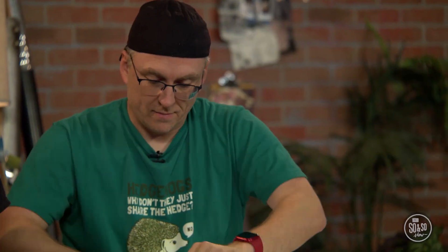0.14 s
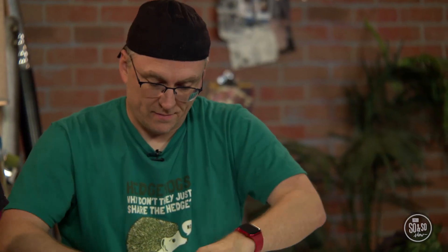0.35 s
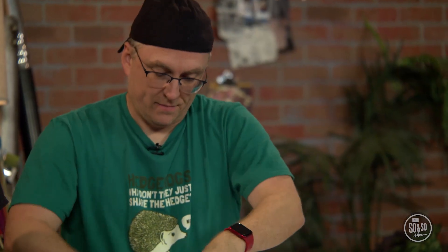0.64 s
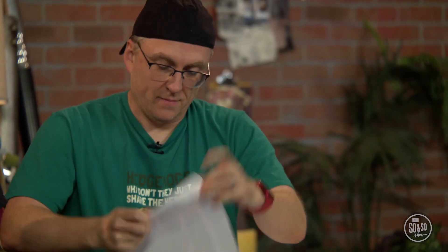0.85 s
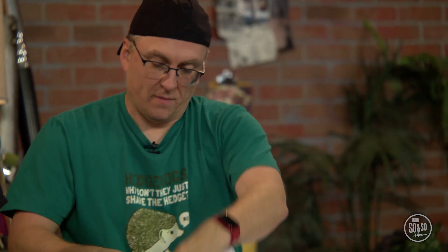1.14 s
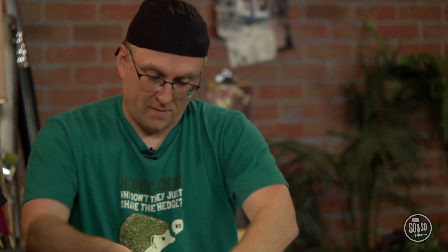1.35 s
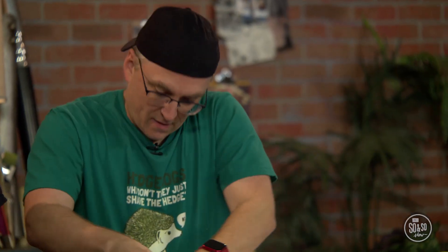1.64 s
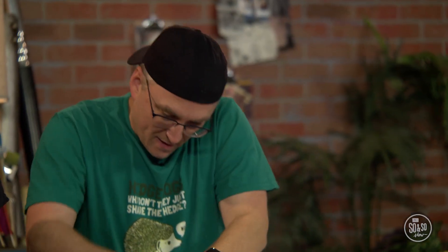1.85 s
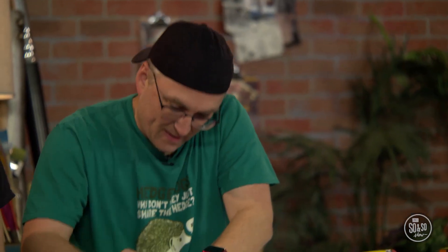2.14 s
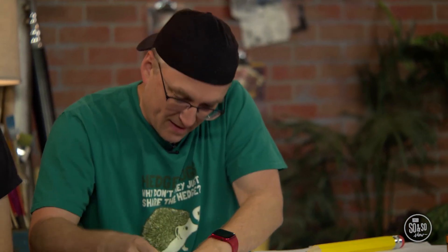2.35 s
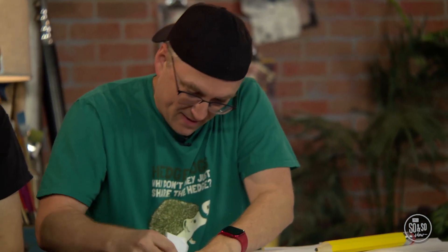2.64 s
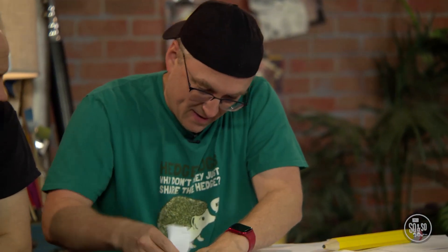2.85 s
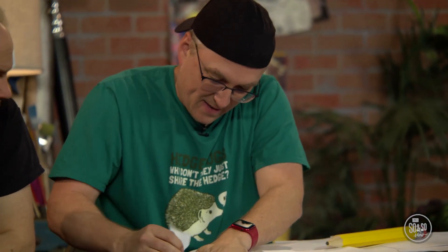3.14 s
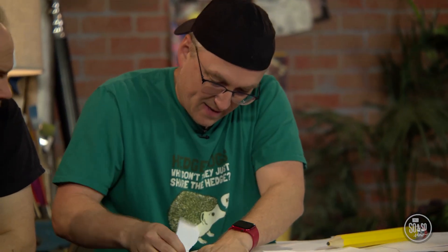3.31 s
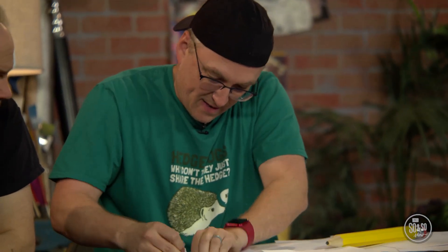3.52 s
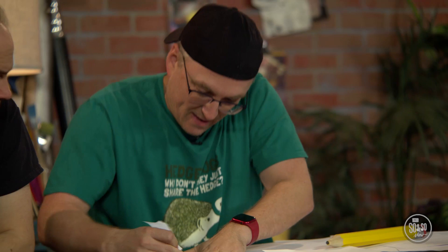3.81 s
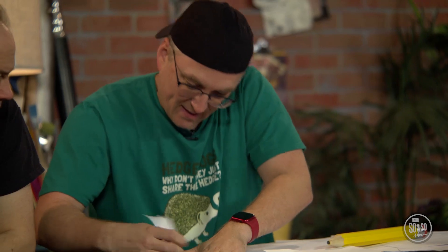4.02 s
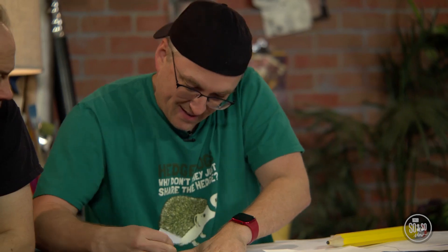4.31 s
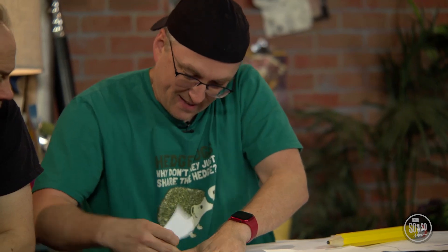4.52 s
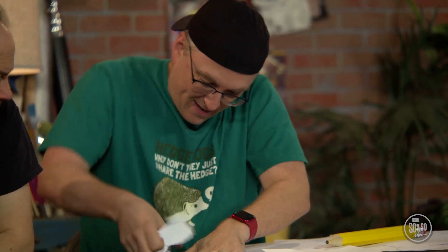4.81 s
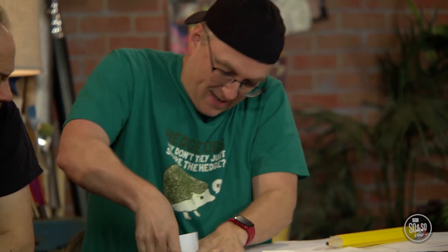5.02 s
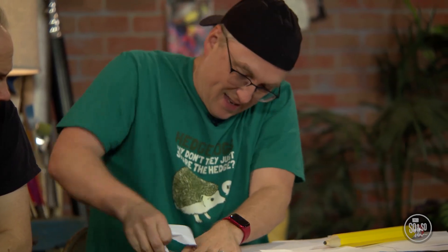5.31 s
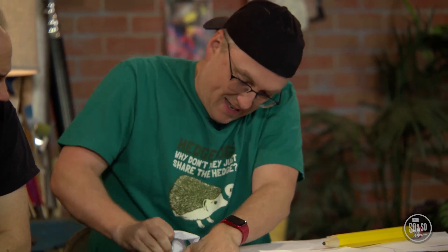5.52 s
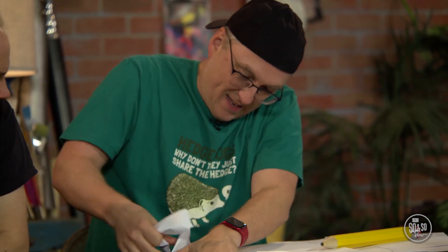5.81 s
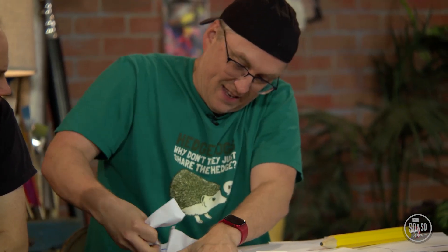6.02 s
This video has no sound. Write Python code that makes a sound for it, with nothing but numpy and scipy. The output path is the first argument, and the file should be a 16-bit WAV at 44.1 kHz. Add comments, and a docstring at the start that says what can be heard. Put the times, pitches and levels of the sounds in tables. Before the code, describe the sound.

A sheet of paper is handled, creased and torn by hand in short, crisp, uneven rips, close up in a quiet room.

```python
"""Close, crisp crackling and snapping: a sheet of paper is handled and creased, then torn in short rips.
Fibres fracture in clumps of tiny cracks, which also drive the lower rattle of the free flap and a fine
fizz. Creases snap, curved patches buckle with a pop, and sliding paper hisses. Underneath, hands bump
the table and it rumbles faintly; the quiet room adds only a short tail and a steady hush."""
import sys
import numpy as np
from scipy import signal
from scipy.fft import rfft, irfft, next_fast_len
from scipy.io import wavfile
from scipy.ndimage import uniform_filter1d

SR = 44100
rng = np.random.default_rng(int(sys.argv[2]) if len(sys.argv) > 2 else 0)


def generate_wav(signal):
    """Clip the signal to [-1, 1] and save it as 16-bit WAV at the path in sys.argv[1]."""
    frames = np.transpose(np.atleast_2d(signal))
    scaled = np.clip(frames, -1, 1) * 32767
    pcm = np.round(scaled).astype(np.int16)
    wavfile.write(sys.argv[1], SR, pcm)


N = 271634

# Pulls of the hands: start_s, length_s, fibre_db, change_over_pull_db, flap_re_fibre_db, fizz_re_fibre_db
PULLS = [(0.0, 0.023, -46.5, -10, -1, -5), (0.088, 0.031, -33, -30, -5, -35),
         (0.195, 0.05, -28, -16, -7, -24), (0.231, 0.065, -27.5, -38, -10.5, -13),
         (0.301, 0.081, -51, 21, 1.5, -6), (0.432, 0.025, -41.5, 1, -27, -8.5),
         (0.496, 0.076, -45, 13, -6, -9), (0.73, 0.043, -44, -28, -35, -4.5),
         (0.818, 0.022, -45.5, 10, -31, -7), (0.893, 0.068, -45, -18, -6, -17),
         (0.965, 0.081, -38.5, -3, -6, -23), (1.088, 0.1, -36, -16, -10, -41),
         (1.183, 0.14, -44.5, 3, -6.5, -13), (1.427, 0.1, -46.5, -9, -7.5, -9.5),
         (1.526, 0.065, -43, -7, -4.5, -14.5), (1.672, 0.02, -43, 0, -8, -11),
         (1.804, 0.041, -47.5, -12, -34, -5), (1.957, 0.1, -43, -8, -15, -7),
         (2.131, 0.039, -28.5, 9, -11.5, -4), (2.154, 0.071, -21.5, -1, -18, -11),
         (2.301, 0.064, -39, -18, -7, -10), (2.418, 0.079, -40.5, -21, -31, -9),
         (2.506, 0.12, -49, -1, -4.5, -21), (2.679, 0.022, -40.5, -1, -2, -4),
         (2.722, 0.034, -24.5, 20.5, -31, -23), (2.763, 0.049, -25.5, 3.5, -23, -10),
         (2.856, 0.072, -48.5, 6, -8, -9), (3.042, 0.075, -42.5, -1, -2, -6.5),
         (3.14, 0.081, -39.5, -29, -13, -8), (3.206, 0.048, -30, 5, -14.5, -9),
         (3.425, 0.033, -40, 13.5, 1.5, -15), (3.469, 0.09, -37.5, -11, -10.5, -3.5),
         (3.564, 0.12, -46.5, 13, -5, -11), (3.748, 0.078, -40, -13, -8, -5),
         (3.85, 0.094, -37, -1, -25, 1.5), (3.99, 0.039, -40.5, -27, -4, 3.5),
         (4.299, 0.19, -35.5, -13, -7, -4.5), (4.558, 0.099, -48, -14, -8.5, -20),
         (5.184, 0.059, -50, -12, 4.5, -4.5), (5.37, 0.073, -51.5, 4, -8, -0.5),
         (5.559, 0.077, -44, 0, 5, -6), (5.626, 0.13, -53, -6, 5.5, -1.5),
         (5.963, 0.14, -50.5, -22, -4, -1.5)]
# Rustle between pulls: time_s, fibre_db, flap_re_fibre_db, fizz_re_fibre_db
RUSTLE = [(0, -46, 4, -14), (.3, -45.5, -3.5, -10.5), (.65, -52.5, -11.5, -10), (1.1, -48.5, 4.5, -5.5),
          (1.4, -50.5, -10, -7), (1.9, -53, -4.5, -18), (2.3, -48, -10.5, -9.5), (3, -47.5, -4.5, -12.5),
          (3.4, -52.5, -4.5, -5), (4.2, -51, -11, -8.5), (4.7, -52.5, -7.5, -6), (5.4, -59, 7, -1.5),
          (6.16, -59.5, -8.5, -0.5)]
# The hands hold still: start_s, length_s
PAUSES = [(1.747, 0.039), (2.061, 0.041), (2.61, 0.037), (2.707, 0.016), (3.357, 0.047), (4.478, 0.056),
          (5.778, 0.022), (6.089, 0.018)]
# Spectra of the four stages (sheet held up, tear begun, tear deep, strip loose): frequency_hz, gain_db
HELD_SPECTRUM = [(180, -20), (300, 2), (1040, -8), (3460, -11), (6410, -14.5), (10700, -37.5)]
BEGUN_SPECTRUM = [(300, -10), (1350, -10), (1960, -15), (2520, -16), (3100, -17.5), (3990, -3),
                  (6720, -6.5), (8030, -2), (10500, -6.5)]
DEEP_SPECTRUM = [(300, -26), (680, -12), (957, -2.5), (2170, 1), (3390, -10), (3990, -3), (5710, -1.5),
                 (7240, -8.5), (9460, 2.5), (10500, 1)]
LOOSE_SPECTRUM = [(180, -48), (300, -26), (930, -3), (1600, 5.5), (2000, 8.5), (2500, 7), (3520, 8),
                  (4440, -2.5), (6300, 0), (12700, -21)]
# Upper edge of the flap's band in each stage (a small strip rings higher): edge_hz
FLAP_TOP_HZ = [2500, 2240, 3300, 4720]
# Sliding hiss against the cracks (held up, tear begins, tear ends, strip loose): gain_db
SLIDE_DB = [1, -4, -4, 5]
# Highest band of the fizz at the same four points: gain_db
AIRY_DB = [-8, -6, 4, 7]
# Snapping creases: start_s, strength_db, ring_hz, jolt_offset_db
SNAPS = [(0.0916, -15.5, 3680, -38), (0.113, -22, 2650, -14), (0.163, -20.5, 3770, -15),
         (0.203, -8.5, 2880, -19), (0.2388, -8.5, 3000, -11), (0.328, -14.5, 4000, -8.5),
         (0.5032, -23, 2700, -6.5), (0.5432, -19, 3200, -9), (0.5513, -19.5, 4440, -2.5),
         (0.56, -20, 3500, -7), (0.569, -19.5, 3000, -6), (0.842, -23, 3300, -16.5),
         (0.9128, -19.5, 2640, -7), (1.0041, -37, 3200, -13), (1.0994, -16.5, 3700, -29),
         (1.114, -18, 3220, -18), (1.151, -25, 3100, -24), (1.2473, -15, 3230, -28),
         (1.265, -20.5, 3160, -15), (1.375, -24, 3430, -23), (1.4324, -16, 3470, -34),
         (1.6237, -22, 2880, -16.5), (1.729, -24, 3670, -12.5), (2.0275, -20.5, 5200, -19),
         (2.188, -19, 4170, -28), (2.2309, -13, 3750, -15), (2.2846, -23.5, 5700, -5.5),
         (2.7587, -4, 4150, -40), (2.766, -3, 4120, -49), (2.7875, -11.5, 5200, -32),
         (2.7928, -12, 4800, -33), (3.157, -17, 5340, -18), (3.2257, -27, 5100, -28),
         (3.4539, -16.5, 5100, -11), (3.6825, -18.5, 4830, -30), (3.747, -22, 5100, -17),
         (3.7709, -21.5, 5730, -11.5), (3.7993, -31, 5500, -26), (3.9074, -16, 6070, -23.5),
         (3.9973, -14.5, 6340, -46), (4.008, -19, 6050, -23), (4.024, -15, 6350, -31),
         (4.041, -21, 6000, -15.5), (4.055, -28.5, 5600, -9), (4.2342, -24.5, 4540, -14.5),
         (4.2674, -15, 4900, -12), (4.2886, -21, 5540, -12.5), (4.345, -17.5, 4800, -39),
         (4.353, -13, 5070, -37), (4.3595, -14.5, 5260, -29), (4.414, -23, 5200, -28),
         (4.447, -18.5, 4300, -23), (4.466, -28, 4500, -22), (6.012, -24.5, 2870, -17)]
# Band that a snap's jolt shakes (sheet held up, laid down): low_hz, high_hz
JOLT_BANDS = [(254, 1510), (650, 2070)]
# Pops of the bent sheet, dry ticks when short, and one hollow ringing knock of the table (the 241 Hz row):
# start_s, level_db, pitch_hz, t60_s
POPS = [(0.2398, -24.5, 241, 0.12), (0.662, -22.5, 2500, 0.0013), (0.669, -24.5, 1760, 0.0033),
        (2.16, -23, 1147, 0.066), (2.167, -30.5, 830, 0.063), (2.2858, -15, 5860, 0.00072),
        (2.3159, -14, 3280, 0.0013), (4.269, -29, 1400, 0.012), (4.288, -23, 1260, 0.011),
        (4.609, -29, 1340, 0.0099), (4.7422, -26.5, 1450, 0.0078), (4.9756, -34, 2220, 0.002),
        (5.1209, -22.5, 4500, 0.0013), (5.4537, -28.5, 4000, 0.0018), (5.5314, -22.5, 5630, 0.002)]
# Slides of the curved sheet: start_s, length_s, level_db, centre_hz, width_hz
SWISHES = [(1.027, 0.05, -39.5, 1600, 500), (5.565, 0.099, -42.5, 2160, 800)]
# Hands bump the table: peak_s, level_db, pitch_hz
BUMPS = [(0.2, -36, 317), (0.212, -34.5, 77.6), (0.356, -36, 182), (0.37, -38, 110), (0.382, -34, 352),
         (0.39, -31.5, 101), (0.506, -40, 280), (0.91, -38.5, 269), (1.127, -39, 75.5), (1.261, -38, 87),
         (1.476, -38.5, 300), (1.485, -32, 93), (1.557, -38, 68), (2.237, -36, 67.5), (2.289, -35, 75.4),
         (2.971, -36.5, 280), (3.06, -31.5, 71.6), (3.45, -38, 87), (3.686, -38.5, 89), (3.736, -30.5, 73),
         (4.241, -36, 65), (4.278, -34.5, 60), (5.355, -37, 66)]
# Course of the table's rumble: time_s, level_db
RUMBLE_LEVELS = [(0.0, -44), (0.14, -52.5), (0.46, -48), (0.62, -53), (2.52, -55), (3.1, -52),
                 (3.24, -60.5), (3.48, -55), (3.62, -52), (4.05, -56.5), (4.78, -57.5), (5.92, -65),
                 (6.16, -64.5)]
# Spectrum of the rumble: frequency_hz, gain_db
RUMBLE_SPECTRUM = [(12, -52), (20, 6), (187, -3.5), (238, -8.5), (500, -13), (1100, -120)]
# Spectrum of the room tone: frequency_hz, gain_db
AIR_SPECTRUM = [(18, -36), (118, -31), (554, -2.5), (1070, -1.5), (2750, -6), (5740, -4.5), (12300, -17),
                (16000, -20)]

LAID_S, DEEP_S, LIFTED_S = 1.793, 3.6, 5.1  # sheet laid down, tear runs deep, strip pulled away
FIZZ_HZ, AIRY_HZ, TOP_HZ = 8640, 13470, 18000  # band edges of the treble
RISE_S, RISE_SHARE, STOP_S = 0.0052, 0.15, 0.023  # a pull's rise lengthens by this share of its length
ARCH_DB_PER_S, PAUSE_DB = 44, -24  # a long pull swells further above its ends; the rustle dips in a pause
STICK_DB, AIRY_DB_PER_DB = 5.5, 0.8  # a fizzier tear stutters more and reaches higher
SNAP_T60_S, RING_DB_PER_DB = 0.018, 0.28  # decay of a -16 dB snap; a louder one rings longer
JOLT_T60_S = [0.037, 0.034]  # sheet held up, laid down


def tearing(fibre_db, flap_db, fizz_db):
    """Source and filter: the same fractures and friction excite the flap, the fibres and the fizz."""
    t = np.arange(N) / SR
    stage_s = [LAID_S - .1, LAID_S, LIFTED_S - .5, LIFTED_S]
    slide_db, airy_db = (np.interp(t, stage_s, db) for db in (SLIDE_DB, AIRY_DB))
    slide_db += 2.5 * drift(40)
    cracks_per_s = 894 + 140 * np.clip(fibre_db + 51, 0, 35)  # the harder the pull, the denser
    breaks = unit_rms(fractures(cracks_per_s, spread_db=2.8, clump_db=4))
    slide = gain_of(slide_db) * rng.standard_normal(N)
    excitation = bending(breaks + slide, depth_db=2.7)
    laid, deep, lifted = (np.clip((t - s) / 0.056, 0, 1) for s in (LAID_S, DEEP_S, LIFTED_S))
    stick_db = .5 * (1 + laid - lifted) * STICK_DB * gain_of(.5 * (fizz_db - fibre_db))
    stutter = gain_of(stick_db * drift(109) - np.log(10) / 20 * stick_db ** 2)  # keeps the mean power
    shares = [1 - laid, laid - deep, deep - lifted, lifted]
    spectra = [HELD_SPECTRUM, BEGUN_SPECTRUM, DEEP_SPECTRUM, LOOSE_SPECTRUM]
    body = np.zeros(N)
    for share, spectrum, edge_hz in zip(shares, spectra, FLAP_TOP_HZ):
        sheet = coloured(excitation, spectrum)
        flap = gain_of(flap_db) * unit_rms(band(sheet, 510, edge_hz))
        fibres = gain_of(fibre_db) * unit_rms(band(sheet, edge_hz, FIZZ_HZ))
        body += share * (fibres + flap)
    fizz = bending(breaks + gain_of(-7) * slide, depth_db=2)  # sliding hardly reaches this high
    fizz = band(fizz, 0.93 * FIZZ_HZ, TOP_HZ)
    fizz = unit_rms(coloured(fizz, [(FIZZ_HZ, 0), (11500, -5), (16000, -3)]))
    airy_db += AIRY_DB_PER_DB * (fizz_db - fibre_db - 14.5)
    fizz = band(fizz, FIZZ_HZ / 2, AIRY_HZ) + gain_of(airy_db) * band(fizz, AIRY_HZ, TOP_HZ)
    return stutter * (body + gain_of(fizz_db) * fizz)


def hand_effort():
    """Incoherent sources add in power: pulls and rustle sum to the fibre, flap and fizz levels in dB."""
    t = np.arange(N) / SR
    fibre_db, flap_db, fizz_db = curves(RUSTLE)
    still = sum(np.clip(np.minimum(t - s, s + length - t) / STOP_S + .5, 0, 1) for s, length in PAUSES)
    power = gain_of(fibre_db + PAUSE_DB * still + [0 * t, flap_db, fizz_db]) ** 2
    for start, length, db, change_db, *offsets_db in PULLS:
        age = np.arange(0, length + STOP_S, 1 / SR)
        rise = age / (RISE_S + RISE_SHARE * length)
        release = (length + STOP_S - age) / STOP_S
        edges = np.clip(np.minimum(rise, release), 0, 1) ** 2
        from_middle = age / length - .5
        arch_db = ARCH_DB_PER_S * length * (2 * from_middle) ** 2
        pull = edges * gain_of(db + change_db * from_middle - arch_db)
        for layer, offset_db in zip(power, [0, *offsets_db]):
            add(layer, start, (pull * gain_of(offset_db)) ** 2)
    return 10 * np.log10(power)


def fractures(per_s, spread_db, clump_db, patches=24):
    """Stick-slip fracture: fibres break at random, many small and few large, in clumps."""
    size = gain_of(spread_db * np.minimum(rng.exponential(1, N), 4))
    impulses = size * (rng.random(N) < per_s / SR)
    impulses = impulses * gain_of(clump_db * drift(106)) / np.sqrt(per_s)
    patch, out = rng.integers(0, patches, N), np.zeros(N)
    for k, hz in enumerate(np.geomspace(1500, 13000, patches)):
        response = crack(rng.standard_normal(512), hz, t60_s=0.0087, ring_db=3.4, rise_s=0.00058)
        out += signal.oaconvolve(impulses * (patch == k), response)[:N]
    return out


def crack(noise, hz, t60_s, ring_db, rise_s):
    """Damped resonance: a patch of sheet reinforces a brief noise burst in a wide band around hz."""
    t = np.arange(len(noise)) / SR
    resonance = np.sin(2 * np.pi * hz * t) * np.exp(-.9 * hz * t)
    ring = np.convolve(noise, resonance)[:len(t)]
    envelope = np.minimum(t / rise_s, 1) * gain_of(-60 * t / t60_s)
    return envelope * (noise + gain_of(ring_db) * unit_rms(ring))


def bending(x, depth_db):
    """Time-varying filtering: as the sheet bends, its colour shifts in patches of about 1 kHz by 50 ms."""
    spectrogram = signal.stft(x, nperseg=256, noverlap=192)[2]
    field = uniform_filter1d(rng.standard_normal(spectrogram.shape), size=7, axis=0)
    field = unit_rms(uniform_filter1d(field, size=36, axis=1))
    return signal.istft(spectrogram * gain_of(depth_db * field), nperseg=256, noverlap=192)[1][:N]


def crease_snaps(fizz_share_db):
    """Impulsive excitation: a crease gives one sharp crack, and its jolt shakes the flap a little longer."""
    sharp, dull = np.zeros(N), np.zeros((2, N))
    for (start, db, hz, jolt_db), noise in zip(SNAPS, rng.standard_normal((len(SNAPS), 2, 2048))):
        laid = int(start > LAID_S)
        t60_s = SNAP_T60_S * gain_of(RING_DB_PER_DB * (db + 16))
        snap = crack(noise[0], hz, t60_s, ring_db=3.2, rise_s=0.00026)
        jolt = crack(noise[1], 2010, JOLT_T60_S[laid], ring_db=2.1, rise_s=0.0015)
        add(sharp, start, gain_of(db) * snap)
        add(dull[laid], start, gain_of(db + jolt_db) * jolt)
    fizz = gain_of(fizz_share_db - 16) * band(sharp, FIZZ_HZ, TOP_HZ)
    jolts = sum(band(x, *edges) for x, edges in zip(dull, JOLT_BANDS))
    return gain_of(-12.5) * band(sharp, 2370, 9400) + fizz + gain_of(-3) * jolts


def buckling_pops():
    """Snap-through buckling: a curved patch flips over and rings briefly on one note; a knock on the table
    rings the same way."""
    out, t = np.zeros(N), np.arange(8000) / SR
    for start, db, hz, t60_s in POPS:
        rise = 1 - np.exp(-t / (0.0074 * t60_s))
        add(out, start, rise * gain_of(db - 60 * t / t60_s) * np.sin(2 * np.pi * hz * t))
    return out


def swishes():
    """Friction noise: the hollow of the sliding sheet passes one band of hiss, which swells and fades."""
    out = np.zeros(N)
    for start, length, db, hz, width_hz in SWISHES:
        swell = np.sin(np.pi * np.arange(0, length, 1 / SR) / length)
        hiss = unit_rms(band(rng.standard_normal(8192), hz - width_hz / 2, hz + width_hz / 2))
        add(out, start, gain_of(db) * swell * hiss[-len(swell):])
    return out


def fibre_ticks(fibre_db, per_s=90):
    """A Poisson process: single fibres of the loose strip let go with needle-sharp ticks."""
    impulses = rng.standard_normal(N) * (rng.random(N) < per_s / SR)
    loose = np.arange(N) > LIFTED_S * SR
    return gain_of(fibre_db + 23) * band(impulses * loose, 1500, 15000)


def table_bumps():
    """Heavily damped vibration: a soft push on the table top gives a few swings that die at once."""
    out, t = np.zeros(N), np.arange(4000) / SR
    for peak_s, db, hz in BUMPS:
        rise_s = (0.14 + hz / 400) / hz  # higher knocks last for more cycles
        envelope = t / rise_s * np.exp(1 - t / rise_s)
        add(out, peak_s - rise_s, gain_of(db) * envelope * np.sin(2 * np.pi * hz * t))
    return out


def table_rumble():
    """Structure-borne sound: the table carries low noise of uneven level."""
    low = unit_rms(coloured(rng.standard_normal(N), RUMBLE_SPECTRUM))
    return gain_of(curves(RUMBLE_LEVELS)[0] + 3.5 * drift(12)) * low


def reverberation(x, t60_s):
    """Diffuse reflection: sparse echoes of random sign decay exponentially."""
    taps = np.zeros(SR // 4)
    delays = np.arange(150, len(taps) - 20, 20) + rng.integers(0, 20, (len(taps) - 151) // 20)
    taps[delays] = rng.choice([-1., 1.], len(delays)) * gain_of(-60 * delays / SR / t60_s)
    return signal.fftconvolve(x, taps / np.linalg.norm(taps))[:N]


def room_tone(level_db):
    """Stationary broadband noise: the hush of the quiet room."""
    return gain_of(level_db) * unit_rms(coloured(rng.standard_normal(N), AIR_SPECTRUM))


def gain_of(db):
    return 10 ** (np.asarray(db) / 20)


def unit_rms(x):
    return x / np.sqrt(np.mean(x ** 2) + 1e-20)


def curves(rows):
    """Linear interpolation of a table's columns in time."""
    times, *columns = np.transpose(rows)
    return [np.interp(np.arange(N) / SR, times, column) for column in columns]


def coloured(x, spectrum):
    """Spectral shaping by (frequency_hz, gain_db) points, joined on a logarithmic frequency axis."""
    size = next_fast_len(N)
    hz = np.fft.rfftfreq(size, 1 / SR)
    point_hz, point_db = np.transpose(spectrum)
    db = np.interp(np.log(hz + 1), np.log(point_hz + 1), point_db)
    return irfft(rfft(x, size) * gain_of(db), size)[:N]


def band(x, low_hz, high_hz):
    return signal.sosfilt(signal.butter(3, [low_hz, high_hz], "band", fs=SR, output="sos"), x)


def drift(cutoff_hz):
    """Low-passed noise: a random wander of rms 1."""
    lowpass = signal.butter(2, cutoff_hz, fs=SR, output="sos")
    return unit_rms(signal.sosfilt(lowpass, rng.standard_normal(N)))


def add(mix, start_s, sound):
    part = mix[round(start_s * SR):][:len(sound)]
    part += sound[:len(part)]


def scene():
    """Superposition: the paper's direct sound, its reverberation, the table and the room tone."""
    fibre_db, flap_db, fizz_db = hand_effort()
    paper = tearing(fibre_db, flap_db, fizz_db) + crease_snaps(fizz_db - fibre_db)
    paper += buckling_pops() + swishes() + fibre_ticks(fibre_db)
    air = room_tone(level_db=-59)
    tail = gain_of(-12) * reverberation(paper, t60_s=0.091)
    return (paper + tail + table_bumps() + table_rumble() + air)[None]


def record(dry):
    """Band limiting: a steep low-pass filter removes the highest treble."""
    lowpass = signal.firwin(511, 15850, window=("kaiser", 9), fs=SR)
    return signal.oaconvolve(dry, lowpass[None], "same")


dry = scene()
out = record(dry)
generate_wav(out)
```